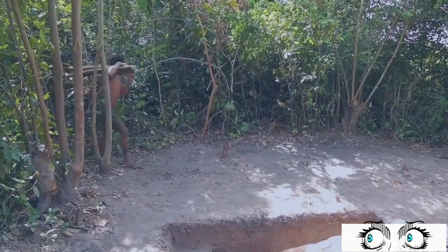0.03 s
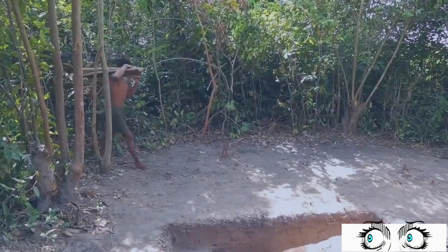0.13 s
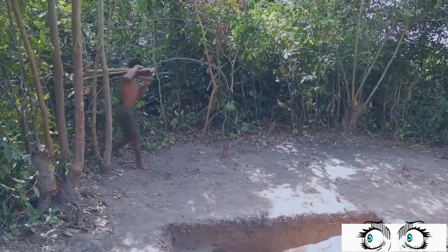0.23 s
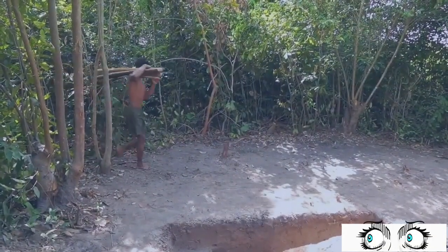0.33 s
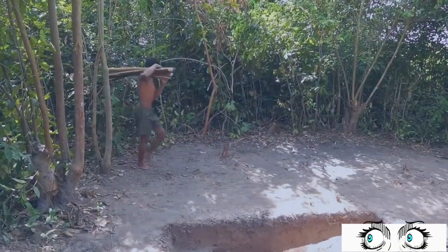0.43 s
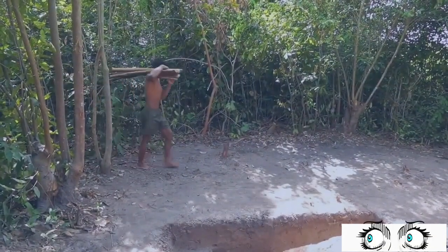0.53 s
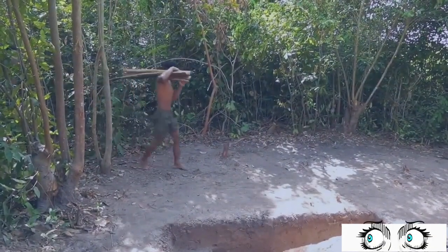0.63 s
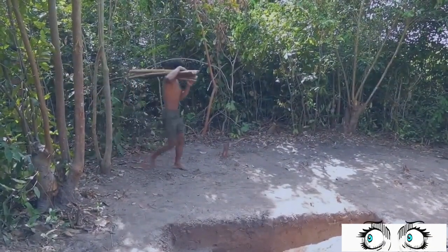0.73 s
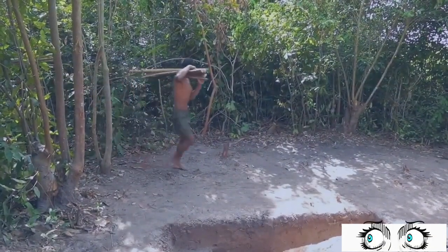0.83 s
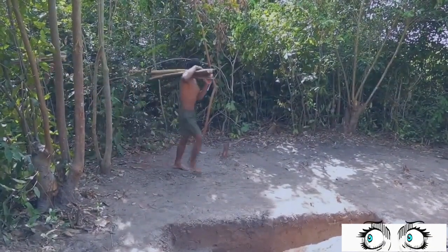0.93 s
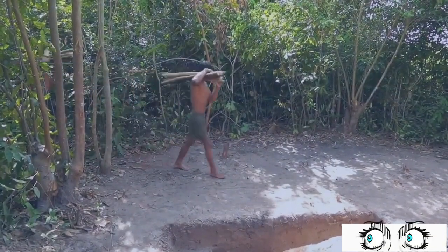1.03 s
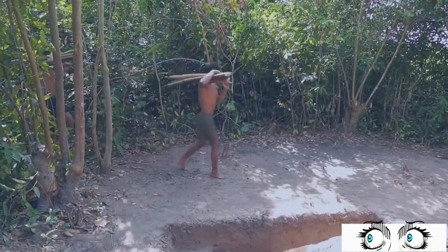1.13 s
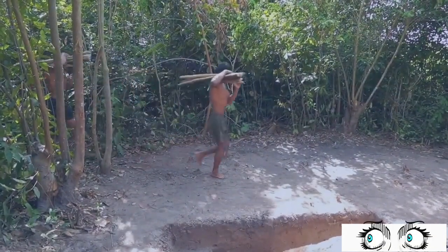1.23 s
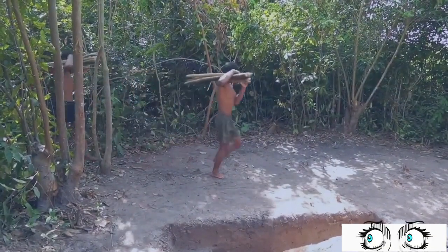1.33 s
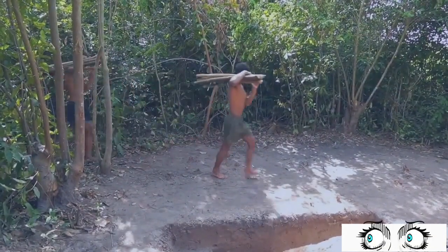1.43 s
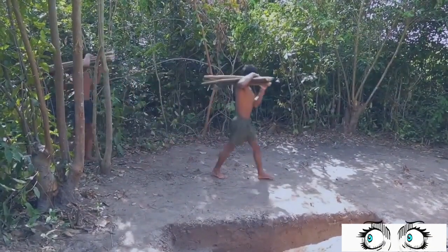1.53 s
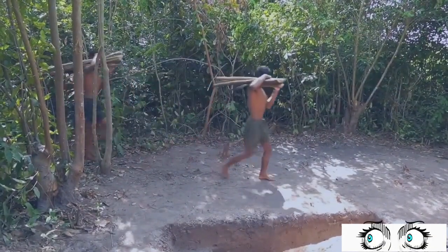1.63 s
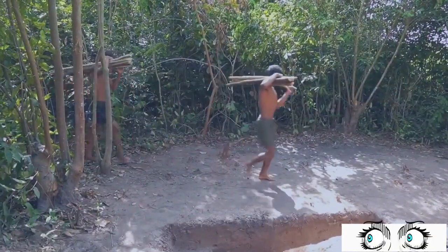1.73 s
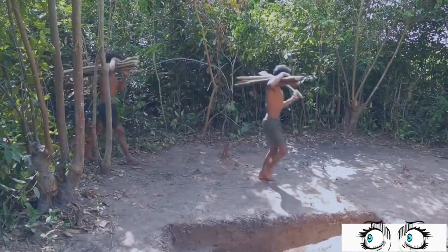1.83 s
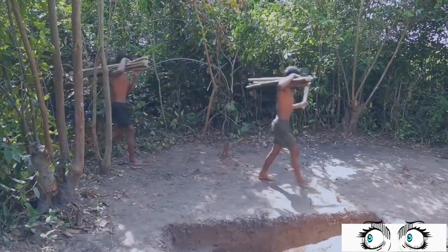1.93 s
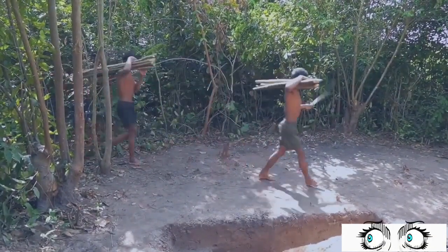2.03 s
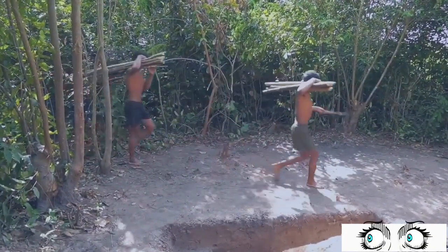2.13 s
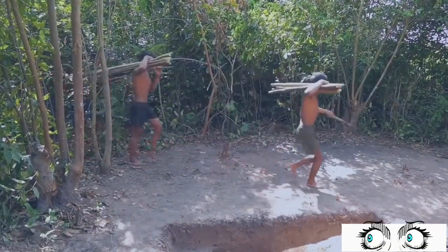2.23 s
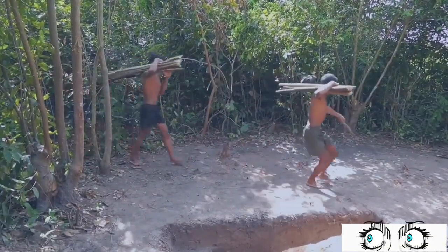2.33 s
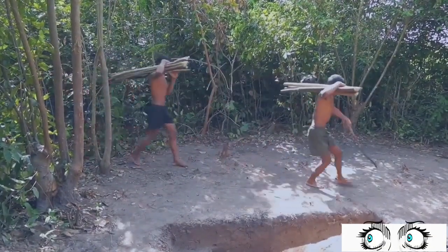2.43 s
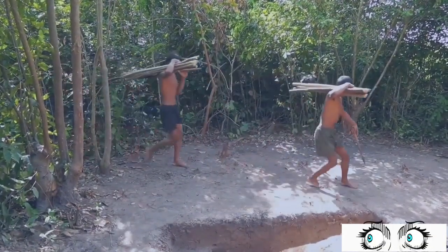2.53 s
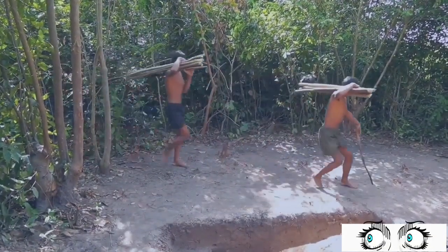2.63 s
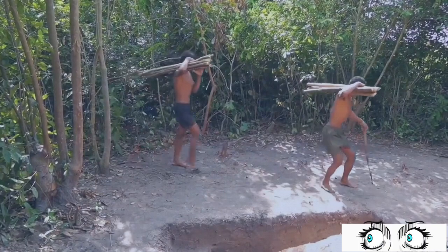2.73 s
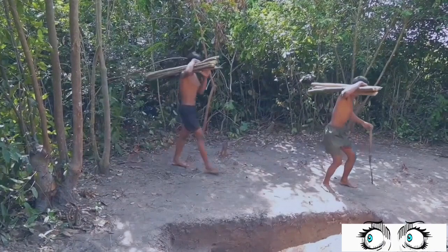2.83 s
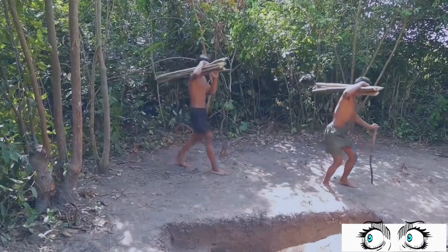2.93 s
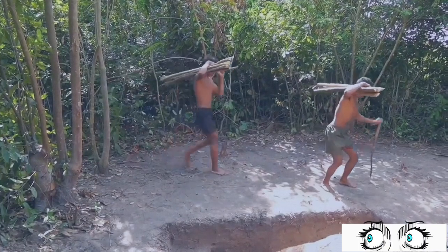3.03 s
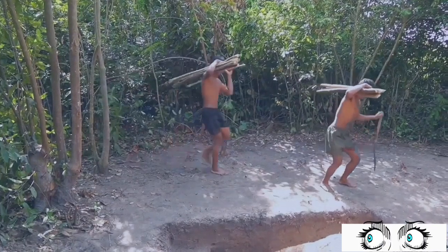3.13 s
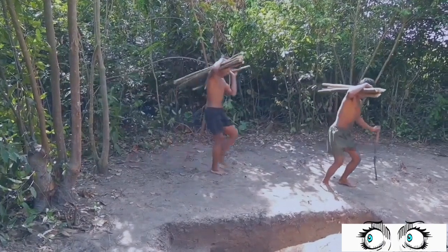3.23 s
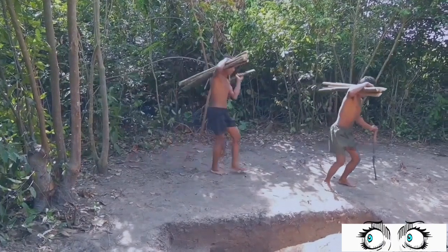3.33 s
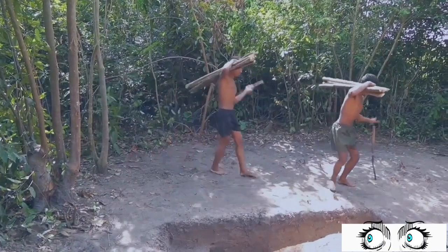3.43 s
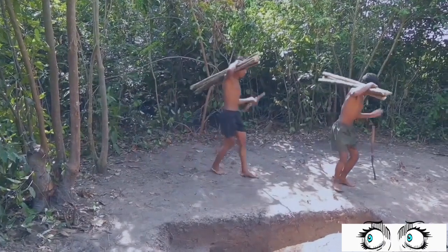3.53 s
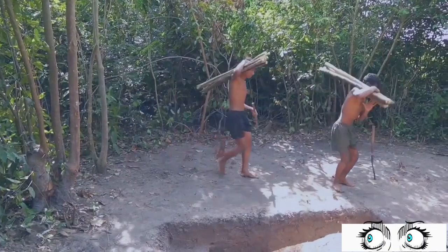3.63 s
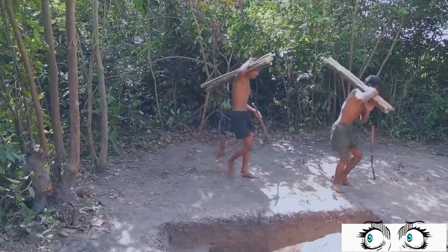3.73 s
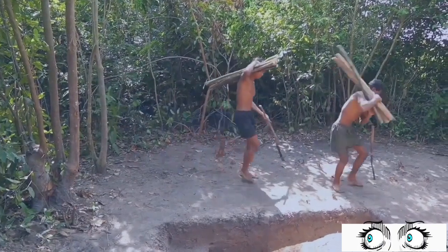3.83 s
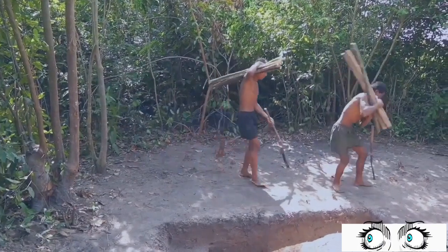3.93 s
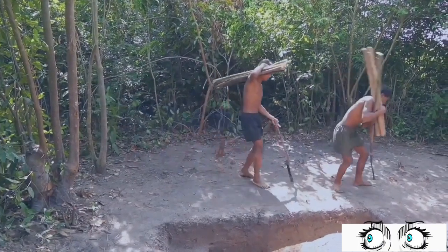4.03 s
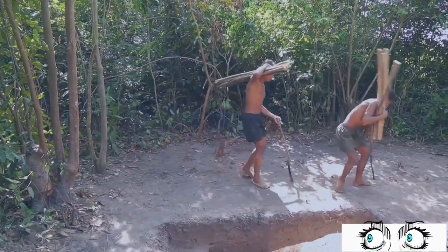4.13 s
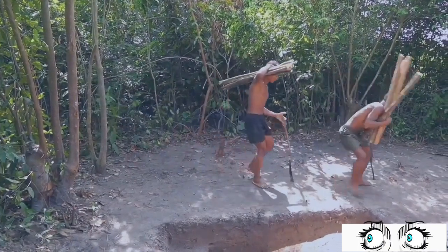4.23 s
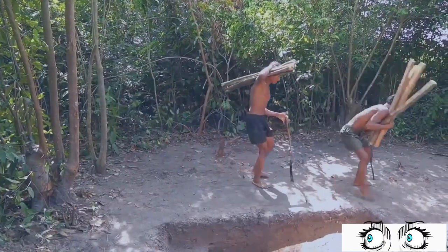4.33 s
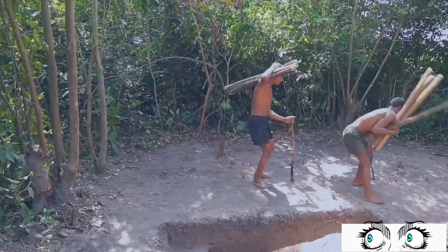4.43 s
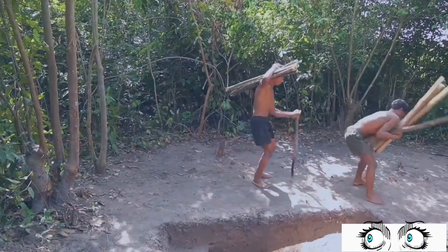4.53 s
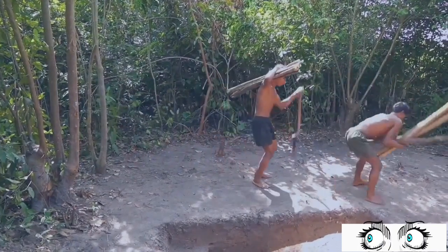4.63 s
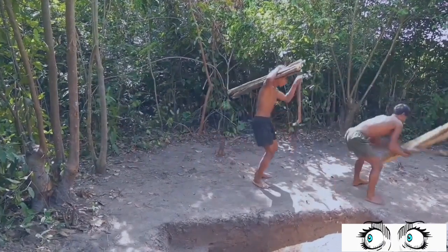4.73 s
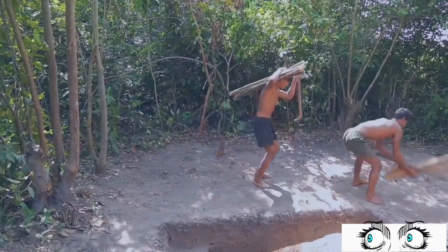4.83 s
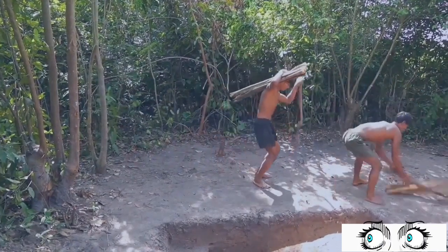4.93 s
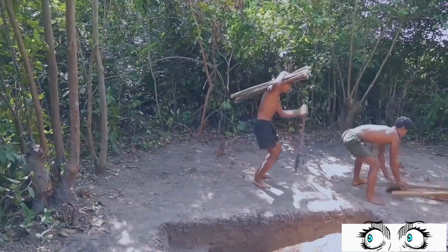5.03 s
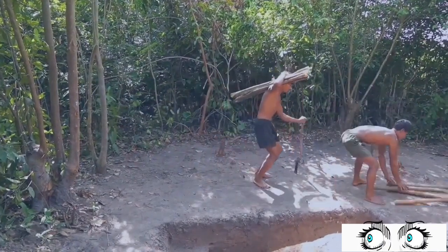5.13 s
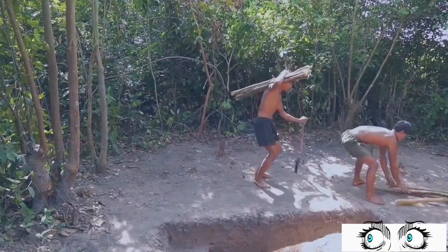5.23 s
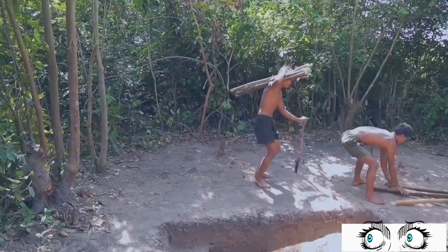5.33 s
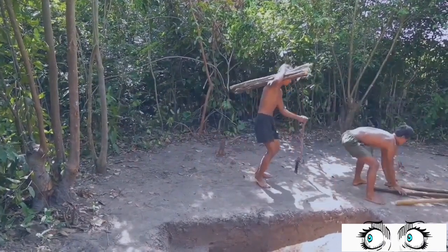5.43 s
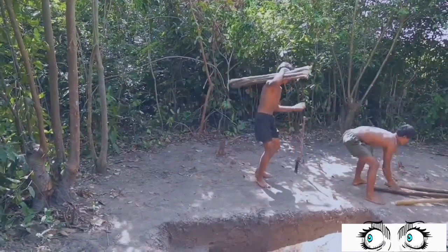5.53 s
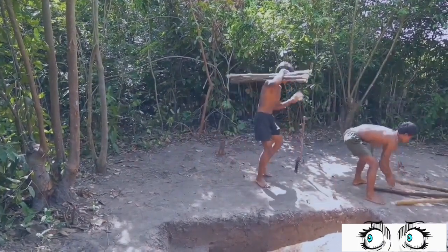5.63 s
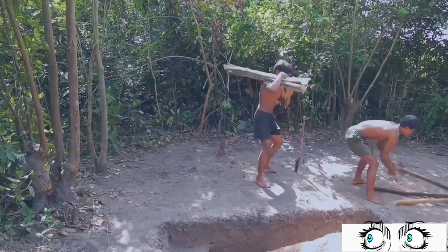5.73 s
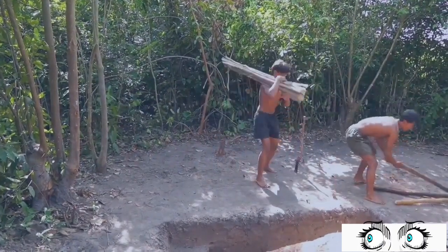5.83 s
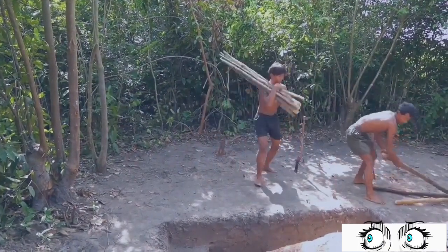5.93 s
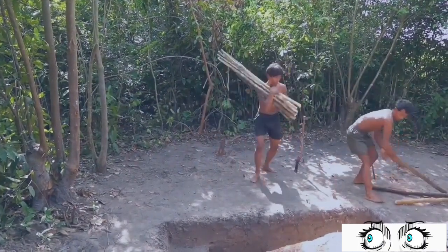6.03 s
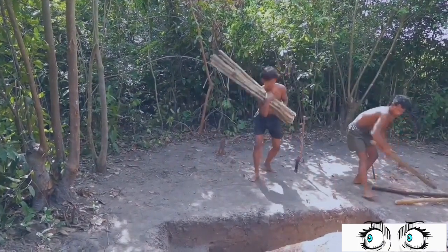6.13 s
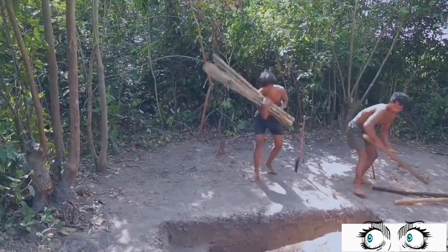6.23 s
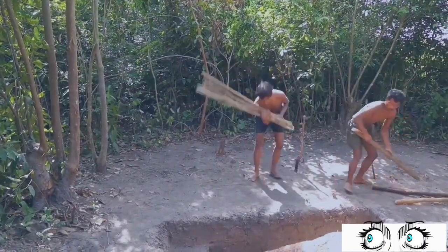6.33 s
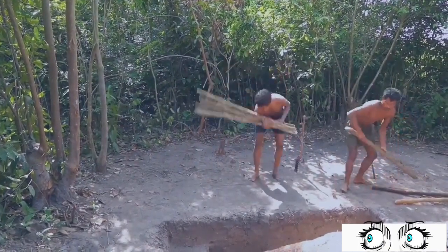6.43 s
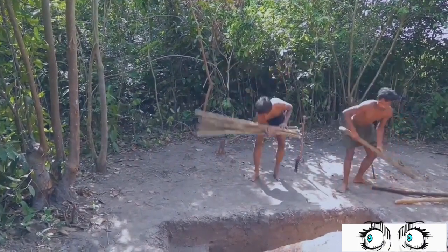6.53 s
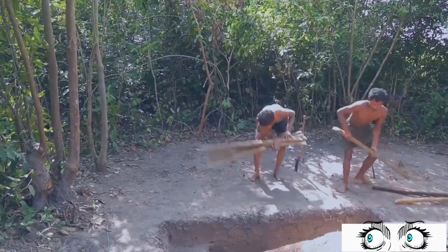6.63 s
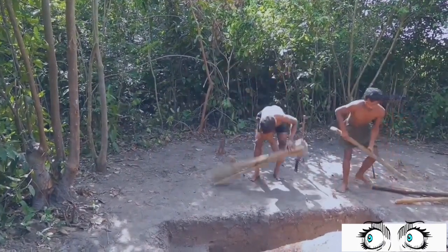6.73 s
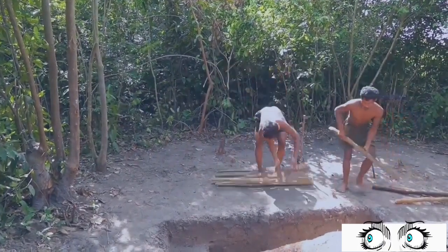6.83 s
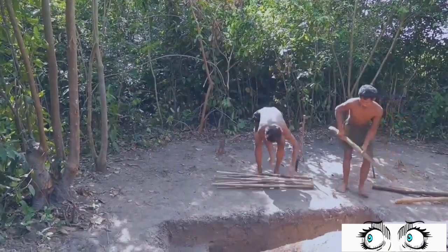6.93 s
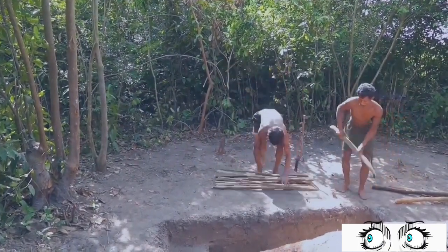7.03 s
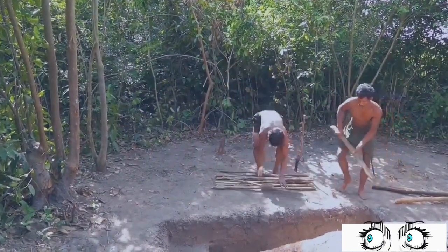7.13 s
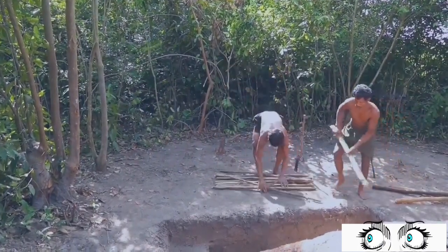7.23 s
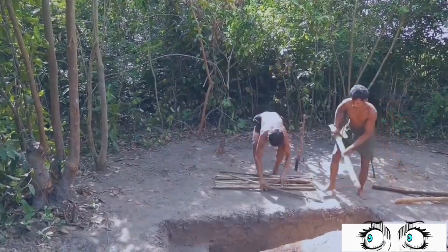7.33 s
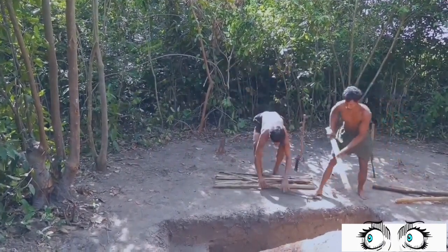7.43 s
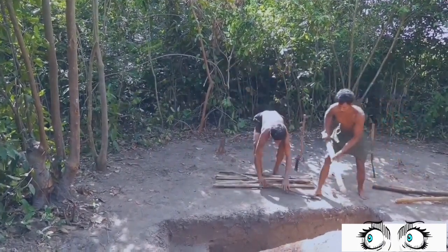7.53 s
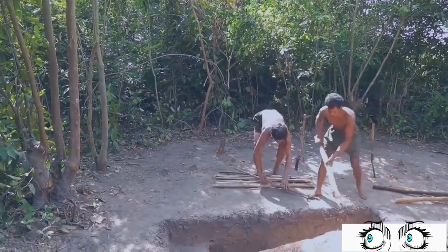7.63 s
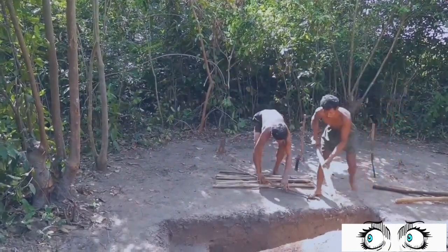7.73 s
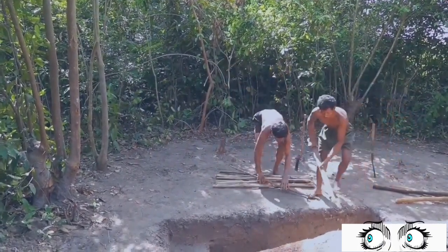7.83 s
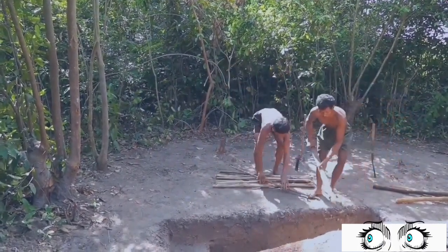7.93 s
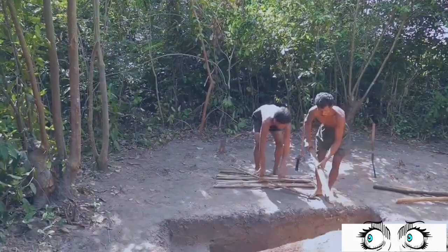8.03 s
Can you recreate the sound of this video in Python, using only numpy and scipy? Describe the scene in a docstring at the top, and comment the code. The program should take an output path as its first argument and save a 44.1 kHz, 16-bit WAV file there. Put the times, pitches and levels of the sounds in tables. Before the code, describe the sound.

Faint insects chirp behind soft steps on leafy soil; thick poles drop with ringing knocks, then thin canes land with a brighter rattle.

```python
"""Poles dropped in a forest clearing

Two people carry bundles of poles, scuffing dry leaves and soil and snapping twigs.
They drop them on bare ground, and a hail of contacts excites the damped modes of the wood: first
thick poles ring, then thin canes clatter brightly. Trunks scatter faint echoes of knocks and snaps.
Insects chirp with their wings in the bushes, and something hums far away under the noise of the air."""
import sys
import numpy as np
from scipy import signal
from scipy.io import wavfile

SR = 44100
rng = np.random.default_rng(int(sys.argv[2]) if len(sys.argv) > 2 else 0)


def generate_wav(sig):
    """Save sig (samples, or channels by samples) to the path in sys.argv[1] as 16-bit PCM at SR."""
    pcm = np.round(np.clip(np.atleast_2d(sig).T, -1, 1) * 32767).astype(np.int16)
    wavfile.write(sys.argv[1], SR, pcm)


N = 355842
FIRST_DROP = 5 * SR   # sample from which bundles may land
STEP = 40   # samples between the points of a slow envelope

# Bundles landing and settling. Each row: start in seconds; rise, hold and time to fall 10 dB in seconds;
# levels in dB of the ground thud, the low ring, the cane rattle and the splintery top.
BUNDLE_LANDINGS = [(5.13, .05, .045, .05, -43, -42, -39.5, -53),
                   (5.372, .006, .005, .02, -45, -49, -58, -80),
                   (5.428, .006, .03, .028, -44, -46, -60, -70),
                   (6.935, .016, .015, .075, -48, -47, -36.5, -36),
                   (7.045, .003, .005, .012, -36, -42, -40, -44),
                   (7.063, .006, .015, .04, -52, -47, -30, -35),
                   (7.085, .04, .015, .042, -46, -46, -27.5, -40),
                   (7.3, .01, .03, .022, -52, -57, -60, -72)]
# Modes of a pole. Each row: frequency in Hz, level in dB, ring time as a multiple of the contact's t60.
POLE_MODES = [(256, 1, 1.2), (377, -1, .9), (490, -6, .7), (581, 0, .9), (651, 1, 2.8), (722, 5, 1.4),
              (894, -2, 1.0), (1000, 3, .9), (1090, 1, 1.3), (1180, 1, 1.3), (1280, 0, 1.0), (1421, 3, .85),
              (1535, 2, 1.1), (1744, 0, .8), (1900, 1, .9), (2030, 1, .8), (2280, 0, .8), (2470, -1, .8),
              (2790, -3, .6), (3180, -4, .6)]
# Spectrum of rattling canes. Each row: frequency in Hz, relative spectral density in dB.
CANE_SPECTRUM = [(710, -40), (1200, 1), (1760, -4), (1980, 5), (2150, -3.5), (2700, 3), (4560, -20),
                 (7000, -30), (9100, -59), (15400, -120)]
# Single knocks of wood. Each row: start in seconds, low ring level in dB and centre in Hz,
# high ring level in dB and centre in Hz, crack level in dB, base t60 in seconds.
WOOD_KNOCKS = [(0.011, -57.5, 773, -67.5, 1120, -57.5, .076), (0.401, -55, 860, -52, 2140, -36, .045),
               (0.834, -48, 388, -67.5, 3000, -58, .023), (1.765, -45, 300, -66, 900, -58, .06),
               (3.451, -43, 270, -50, 900, -33, .032), (3.989, -61.5, 730, -57.5, 1950, -53, .024),
               (4.648, -47.5, 265, -50, 1530, -37.5, .023), (5.135, -31.5, 253, -51.5, 1550, -30, .06),
               (5.155, -24, 490, -27.5, 1290, -20, .026), (5.165, -27, 262, -27, 988, -18, .028),
               (5.182, -26, 497, -32.5, 1180, -22, .085), (5.214, -37.5, 654, -35, 2130, -40.5, .1),
               (5.375, -38, 750, -28.5, 1000, -27, .039), (5.428, -30.5, 752, -27, 1900, -17, .033),
               (5.434, -40, 1090, -28, 1421, -40, .04), (5.48, -39, 710, -39, 1535, -42, .05),
               (5.499, -28, 258, -43.5, 1090, -44.5, .027), (5.539, -35, 800, -35, 1050, -46.5, .04),
               (6.207, -60.5, 237, -66, 1160, -62.5, .093), (6.551, -47, 850, -47, 1744, -32, .055),
               (6.615, -58, 1230, -49, 2060, -36, .05), (6.94, -38.5, 1280, -31, 1880, -30, .03),
               (6.952, -49, 220, -33, 1930, -44, .091), (6.975, -33, 316, -24.5, 2230, -33, .028),
               (7.045, -30, 880, -30, 1421, -12, .018), (7.055, -31.5, 219, -36.5, 2590, -32, .058),
               (7.066, -43, 781, -29.5, 2130, -20, .05), (7.271, -43, 230, -58, 900, -50, .065),
               (7.304, -38, 240, -47, 740, -44, .07), (7.4, -52, 242, -72, 900, -62, .07),
               (7.464, -48, 242, -73.5, 2650, -52.5, .058), (7.594, -62, 760, -69.5, 2100, -56.5, .086),
               (7.747, -58, 234, -62, 904, -48, .059), (7.875, -56, 256, -71.5, 939, -54.5, .08)]
# Where the wood is. Each row: time in seconds, left over right in dB.
WOOD_PAN = [(0, 4), (.9, 1.5), (3.4, -7), (5.4, -7), (5.6, -3), (6.9, -2.2), (7.3, 1.5), (8.07, -6)]

# Feet and poles scuffing leaves and grit. Each row: time of the peak in seconds, level in dB,
# rise in seconds, seconds to fall 10 dB, tilt towards the bass in dB per octave.
LEAF_SCUFFS = [(.03, -54, .05, .06, 1), (.23, -52, .07, .15, 3), (.4, -50, .12, .1, 2.5),
               (.61, -48, .04, .06, 1.5), (.85, -57, .15, .06, 2), (.95, -52.5, .04, .35, 1.8),
               (1.34, -53, .07, .2, 2), (1.64, -51, .04, .06, 1), (1.78, -41.5, .08, .06, 2),
               (1.85, -53, .04, .12, 2), (2.2, -55, .09, .1, 4), (2.31, -53, .07, .14, 2),
               (2.7, -63, .05, .05, 2), (2.79, -62, .04, .12, 3), (2.98, -66, .04, .05, 6),
               (3.01, -64, .1, .12, 4.5), (3.21, -59, .07, .08, 2), (3.47, -50.5, .03, .05, 3.5),
               (3.72, -57.5, .1, .05, 2), (3.87, -68, .08, .2, 7.5), (4.21, -58, .11, .1, 4),
               (4.28, -53, .04, .035, -1.5), (4.48, -64, .09, .06, 3), (4.66, -62, .1, .11, 5),
               (5.175, -42, .045, .105, 4), (5.427, -58.5, .007, .13, 2.5), (6.1, -60, .05, .15, 1.5),
               (6.276, -56, .06, .13, 2.5), (6.634, -60, .16, .13, 4), (6.953, -41.5, .025, .2, 3.5),
               (7.07, -41.5, .04, .08, 4.5), (7.28, -59, .06, .055, 5.5), (7.62, -61, .03, .17, 4),
               (7.86, -67, .15, .03, 3.5)]
# Level of the faint crackling hiss between scuffs; it sinks after each loud landing.
# Each row: time in seconds, treble level in dB.
FAINT_HISS_LEVEL = [(0, -58), (.5, -59.5), (.9, -61), (1.2, -61), (1.6, -58), (2.05, -64), (2.5, -63),
                    (2.9, -69), (4.4, -69), (4.9, -73), (5.12, -68), (5.6, -85), (5.88, -85), (5.95, -68),
                    (6.5, -70), (6.9, -74), (7.45, -85), (8.07, -87)]
# Spectrum of the rustle before its tilt. Each row: frequency in Hz, relative spectral density in dB.
LEAF_SPECTRUM = [(180, -27), (300, 3), (371, -25), (869, -12.5), (1870, -11), (2140, -9.5), (4920, -6),
                 (14000, -7), (15000, -17)]
# Where the feet are. Each row: time in seconds, left over right in dB.
FEET_PAN = [(0, 2), (2, 1.2), (3, -1), (8.07, 0)]
# Twigs breaking underfoot. Each row: start in seconds, level in dB before filtering.
TWIG_SNAPS = [(0.3344, -42), (0.5816, -43), (0.6, -33), (0.618, -39), (0.9322, -45), (3.2094, -47)]

# Insect chirps. Each row: start in seconds, level in dB.
INSECT_CHIRPS = [(0.1497, -64), (0.311, -61), (0.4734, -57), (0.7572, -59), (0.932, -53.5), (1.058, -58),
                 (1.3124, -64), (1.5074, -58), (1.6298, -56), (1.941, -63), (2.04, -56), (2.201, -70),
                 (2.429, -66), (2.5463, -59), (2.722, -60.5), (2.8864, -60), (3.0214, -57), (3.1807, -57),
                 (3.3712, -55.5), (3.529, -62), (3.6676, -57), (3.8098, -56.5), (3.9707, -56.5),
                 (4.141, -56.5), (4.32, -65), (4.4308, -58), (4.6608, -60), (4.7794, -69), (4.92, -55.5),
                 (5.7892, -59.5), (5.902, -65), (6.088, -63), (6.3247, -59), (6.4494, -64), (6.6994, -58.5),
                 (6.8214, -60), (7.394, -66), (7.5837, -64), (7.9069, -63)]
# The two voices of a chirp. Each row: nominal first and last pitch in Hz, dB relative to the chirp.
CHIRP_VOICES = [(4400, 4850, -11), (4760, 5300, -11.5)]
# The far hum. Each row: time in seconds, level in dB.
HUM_LEVEL = [(0, -65), (1, -68), (1.55, -61), (1.85, -70), (2.45, -63.5), (3.25, -70), (3.8, -64),
             (5.0, -61.5), (5.2, -57), (5.4, -62), (5.75, -60), (5.95, -64.5), (6.25, -59.5), (6.85, -61),
             (7.1, -66), (7.55, -62), (8.07, -66.5)]
# Rumble of steps and landings. Each row: time of the peak in seconds, level in dB, hold in seconds.
RUMBLE_SWELLS = [(1.03, -68, .36), (1.8, -70, .01), (2.45, -76, .2), (3.51, -74, .01), (3.8, -76, .3),
                 (5.15, -57, .08), (5.3, -60, .04), (5.48, -58, .07), (6.3, -76, .2), (7.05, -45, .005),
                 (7.26, -60, .005)]
# Spectrum of the open air. Each row: frequency in Hz, relative spectral density in dB.
AIR_SPECTRUM = [(15, -36), (25, -13.5), (69, 1), (176, -6.5), (474, -13.5), (788, -17), (1030, -24),
                (1760, -25), (3500, -27.5), (5860, -32.5), (12700, -31.5), (15000, -47)]
# Likeness of the two channels in diffuse noise. Each row: frequency in Hz, left-right correlation.
COHERENCE = [(60, 0.41), (250, 0.29), (500, 0.27), (1000, 0.22), (2000, 0.2), (4000, .3), (8000, 0.027)]


def falling_bundles():
    """Modal superposition: a hail of contacts rings the poles and canes while the ground thuds."""
    start, rise, hold, fall, thud_db, low_db, rattle_db, top_db = np.array(BUNDLE_LANDINGS).T[:, :, None]

    def envelope(db, rise_s, hold_s, fall_s):
        return power_sum(swells(start + rise_s, db, rise_s, hold_s, fall_s))[FIRST_DROP:]

    size = N - FIRST_DROP
    thud = unit_rms(bandpass(grains(450, spread_db=3.5, size=size)[0], 80, 380, order=3))
    thud = thud * envelope(thud_db, rise_s=.004, hold_s=0, fall_s=2.3 * fall)
    thick_modes = [(hz, amp(db), .094 * share) for hz, db, share in POLE_MODES if hz < 1350]
    thick = unit_rms(sum(struck_modes(thick_modes, per_s=1400, spread_db=3.5)))
    thin_modes = [(hz, 1, 25 / hz) for hz in np.geomspace(650, 1150, 8)]
    thin = unit_rms(sum(struck_modes(thin_modes, per_s=2000, spread_db=3)))
    # the second bundle, of thin canes, has no lasting low ring
    low_ring = np.where(np.arange(size) < SR, thick, thin) * envelope(low_db, rise, hold, 1.6 * fall)
    # canes have many close, short modes, lying left and right in turn
    cane_modes = [(hz, amp(at_hz(CANE_SPECTRUM, hz)) * hz, 60 / hz) for hz in np.geomspace(1250, 6500, 26)]
    cane_rings = struck_modes(cane_modes, per_s=5500, spread_db=2)
    canes = [pan(cane, 7.8 * (-1) ** k) for k, cane in enumerate(cane_rings)]
    rattle = unit_rms(sum(canes[:16])) * envelope(rattle_db, rise, hold, fall)
    top = unit_rms(sum(canes[16:])) * envelope(top_db, rise, hold / 2, fall)
    wood = (low_ring + rattle + top) * pan(1, in_time(WOOD_PAN)[FIRST_DROP:])
    return np.pad(thud + wood, ((0, 0), (FIRST_DROP, 0)))


def pole_knocks():
    """Free vibration: each impact gives a short crack and rings the pole modes near two frequencies."""
    out, t = np.zeros((2, N)), np.arange(SR // 4) / SR
    hz, mode_db, share = np.array(POLE_MODES).T[:, :, None]
    waves, attack = np.sin(2 * np.pi * hz * t), np.minimum(t / .002, 1)
    strengths = amp(mode_db + 1.5 * rng.standard_normal((len(WOOD_KNOCKS), len(POLE_MODES), 1)))
    bursts = bandpass(rng.standard_normal((len(WOOD_KNOCKS), 2, len(t))), 450, 2700)
    for (start, *rings, crack_db, t60), strength, burst in zip(WOOD_KNOCKS, strengths, bursts):
        excitation = 0
        for db, centre_hz in zip(rings[::2], rings[1::2]):
            octaves = np.log2(hz / centre_hz)
            excitation += amp(db - 600 * octaves ** 2) + amp(db - 8.5 - 14 * octaves ** 2)   # peak, skirt
        ringing = np.sum(excitation * strength * waves * decay(t, t60 * share), axis=0)
        crack = amp(crack_db) * burst * decay(t, .75 * t60)   # splinters and bark
        place = pan(np.ones(1), np.interp(start, *np.transpose(WOOD_PAN)))
        add_at(out, start, (ringing + crack) * attack * place)
    # wood on wood is a soft contact, with little treble
    return signal.sosfilt(signal.butter(4, 3600, fs=SR, output="sos"), out + 1e-18)


def leaf_rustle(faint_tilt_db=4.5):
    """Incoherent sources add in power: scuffed leaves and grit crackle over a faint crackling hiss."""
    peak_s, db, rise_s, fall_s, scuff_tilt_db = np.array(LEAF_SCUFFS).T[:, :, None]
    scuffs = swells(peak_s, db, rise_s, 0, fall_s)
    faint_power = amp(in_time(FAINT_HISS_LEVEL)) ** 2
    power = power_sum(scuffs) ** 2 + faint_power
    # the colour is the average tilt of all scuffs and the hiss, each weighted by its power
    weighted_tilt = per_sample(np.sum(scuffs ** 2 * scuff_tilt_db, axis=0)) + faint_power * faint_tilt_db
    crackle = unit_rms(grains(5000, spread_db=2.5, channels=4)).reshape(2, 2, N)
    hiss = rng.standard_normal((2, 2, N))
    source = .71 * crackle + .83 * hiss
    rustle = diffuse(source, LEAF_SPECTRUM, lowest_hz=342, flicker_db=1.86, tilt_db=weighted_tilt / power)
    return np.sqrt(power) * rustle * pan(1, in_time(FEET_PAN))


def twig_snaps():
    """Brittle fracture: a twig breaks with a short, bright burst of noise."""
    out, t = np.zeros((2, N)), np.arange(SR // 20) / SR
    for start, db in TWIG_SNAPS:
        add_at(out, start, amp(db) * decay(t, t60=.013) * rng.standard_normal((2, len(t))))
    return bandpass(out, 900, 6500)


def trunk_echoes(x, t60=.23, echo_db=-12):
    """Scattering: trunks and leaves add a dull, quickly dying blur of echoes, different on each side."""
    t = np.arange(SR // 3) / SR
    dull_noise = signal.lfilter([1], [1, -.6], rng.standard_normal((2, len(t))))
    echoes = dull_noise * decay(t, t60) * (t > .006)
    echoes /= np.sqrt(np.sum(echoes ** 2, axis=1, keepdims=True))
    return x + amp(echo_db) * signal.fftconvolve(x, echoes, axes=1)[:, :N]


def insects(chirp_s=.135, warble_hz=28, detune_hz=110):
    """Stridulation: rough wing tones warble and climb in pairs; far ones blur into a band of noise."""
    out, t = np.zeros((2, N)), np.arange(round(chirp_s * SR)) / SR
    noise = rng.standard_normal((len(INSECT_CHIRPS), 2, 2, 2, 2 * len(t)))
    roughness = signal.lfilter(*signal.butter(3, 170, fs=SR), noise)[..., len(t):]
    envelope = np.minimum(t / .018, 1) * np.sqrt(1 - t / chirp_s)
    for (start, db), voices in zip(INSECT_CHIRPS, roughness):
        for (in_phase, quadrature), (from_hz, to_hz, voice_db) in zip(voices, CHIRP_VOICES):
            offset = rng.standard_normal()
            cycles = (from_hz + detune_hz * offset) * t + (to_hz - from_hz) * t ** 2 / (2 * chirp_s)
            phase = 2 * np.pi * cycles + 3.1 * np.sin(2 * np.pi * warble_hz * t + 3 * offset)
            tone = unit_rms(in_phase * np.cos(phase) + quadrature * np.sin(phase))
            add_at(out, start, amp(db + voice_db) * envelope * tone)
    chorus = unit_rms(bandpass(rng.standard_normal((2, N)), 4200, 5350, order=4))
    chorus_db = in_time([(0, -73), (5, -75.5), (8.07, -77)]) + drift(11)
    return out + amp(chorus_db) * chorus


def far_hum():
    """Narrow-band noise: two close, low resonances in series give a wavering drone."""
    drone = resonate(resonate(rng.standard_normal(N), hz=54, t60=.28), hz=59, t60=.26)
    return amp(in_time(HUM_LEVEL)) * unit_rms(drone)


def rumble(rest_db=-83):
    """Forced vibration: noise drives a low resonance that swells with steps and landings."""
    peak_s, db, hold_s = np.array(RUMBLE_SWELLS).T[:, :, None]
    gain = amp(rest_db) + power_sum(swells(peak_s, db, rise_s=.03, hold_s=hold_s, fall_s=.07))
    return gain * unit_rms(resonate(rng.standard_normal(N), hz=140, t60=.089))


def open_air(level_db=-62):
    """A diffuse field: steady broadband noise, strongest in the bass, flickers band by band."""
    noise = rng.standard_normal((2, 2, N))
    return amp(level_db) * unit_rms(diffuse(noise, AIR_SPECTRUM, lowest_hz=21.45, flicker_db=2.5))


def diffuse(source, spectrum, lowest_hz, flicker_db, tilt_db=0):
    """Partial coherence: two mid-side pairs feed alternate half-octave bands, each with its own level."""
    out, edges = 0, lowest_hz * 2 ** np.arange(0, np.log2(17000 / lowest_hz), .5)
    for k, (low, high) in enumerate(zip(edges, edges[1:])):
        mid, side = bandpass(source[k % 2], low, high)
        hz = np.sqrt(low * high)
        alike = at_hz(COHERENCE, hz)
        gain = amp(at_hz(spectrum, hz) + flicker_db * drift(11.7) + tilt_db * np.log2(8000 / hz))
        out = out + gain * (np.sqrt(1 + alike) * mid + np.sqrt(1 - alike) * side * [[1], [-1]])
    return out


def struck_modes(modes, per_s, spread_db):
    """Impulse excitation: each random contact rings one (Hz, gain, t60) mode; one signal per mode."""
    clicks = grains(per_s, spread_db, size=N - FIRST_DROP)[0]
    struck = rng.integers(0, len(modes), len(clicks))
    return [gain * resonate(clicks * (struck == k), hz, t60) for k, (hz, gain, t60) in enumerate(modes)]


def resonate(force, hz, t60):
    """A damped oscillator: a unit click starts a decaying sine of height 1."""
    r, w = decay(1 / SR, t60), 2 * np.pi * hz / SR
    return signal.lfilter([0, np.sin(w)], [1, -2 * r * np.cos(w), r * r], force + 1e-18)


def grains(per_s, spread_db, channels=1, size=N):
    """A Poisson process: random clicks of uneven size and sign."""
    shape = (channels, size)
    height = amp(spread_db * np.minimum(rng.exponential(1, shape), 4))
    return height * rng.choice([-1, 1], shape) * (rng.random(shape) < per_s / SR)


def swells(peak_s, db, rise_s, hold_s, fall_s):
    """One slow envelope per event: a linear rise, a hold, then exponential decay of 10 dB per fall_s."""
    since = np.arange(0, N + STEP, STEP) / SR - peak_s
    return np.clip(1 + since / rise_s, 0, 1) * amp(db - 10 * np.clip((since - hold_s) / fall_s, 0, 15))


def drift(rate_hz):
    """Low-passed noise: a slow random fluctuation of unit rms."""
    r = np.exp(-2 * np.pi * rate_hz * STEP / SR)
    slow = signal.lfilter([1], [1, -2 * r, r * r], rng.standard_normal(N // STEP + 2002))[2000:]
    return per_sample(unit_rms(slow))


def power_sum(gains):
    """Incoherent addition of slow envelopes, sample by sample."""
    return per_sample(np.sqrt(np.sum(gains ** 2, axis=0)))


def per_sample(slow):
    """Linear interpolation of a slow envelope to every sample."""
    return np.interp(np.arange(N) / STEP, np.arange(len(slow)), slow)


def in_time(curve):
    """Linear interpolation of (seconds, value) rows to every sample."""
    return np.interp(np.arange(N) / SR, *np.transpose(curve))


def at_hz(spectrum, hz):
    """Interpolation of a spectrum on a log-frequency axis."""
    frequencies, values = np.transpose(spectrum)
    return np.interp(np.log(hz), np.log(frequencies), values)


def bandpass(x, low_hz, high_hz, order=2):
    """A maximally flat band filter."""
    return signal.sosfilt(signal.butter(order, [low_hz, high_hz], "band", fs=SR, output="sos"), x)


def add_at(out, start_s, sound):
    """Superposition of a stereo event from its start time on."""
    at = round(start_s * SR)
    out[:, at:at + sound.shape[1]] += sound[:, :N - at]


def pan(x, db):
    """Direction as a level difference, left over right."""
    return np.array([x * amp(db / 2), x * amp(-db / 2)])


def decay(t, t60):
    """Exponential damping, 60 dB in t60 seconds."""
    return amp(-60 * t / t60)


def amp(db):
    """Amplitude ratio of a level in dB."""
    return 10 ** (np.asarray(db) / 20)


def unit_rms(x):
    """Normalisation to unit power."""
    return x / np.sqrt(np.mean(x ** 2) + 1e-20)


def scene():
    """Superposition: echoing knocks and snaps, falling bundles, leaves, insects, hum, rumble and air."""
    air = open_air()
    impacts = trunk_echoes(pole_knocks() + twig_snaps()) + falling_bundles()
    return impacts + leaf_rustle() + insects() + far_hum() + rumble() + air


def record(dry, merge_hz=777, stopband_hz=15350):
    """Long waves reach two close microphone ports alike, so the bass merges; a steep filter cuts the top."""
    mid, side = (dry[0] + dry[1]) / 2, (dry[0] - dry[1]) / 2
    side = signal.lfilter(*signal.butter(1, merge_hz, "high", fs=SR), side)
    top_cut = signal.cheby2(14, 70, stopband_hz, fs=SR, output="sos")
    return signal.sosfilt(top_cut, np.array([mid + side, mid - side]))


dry = scene()
out = record(dry)
generate_wav(out)
```